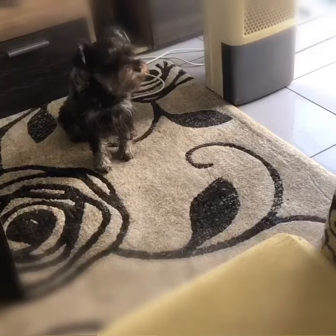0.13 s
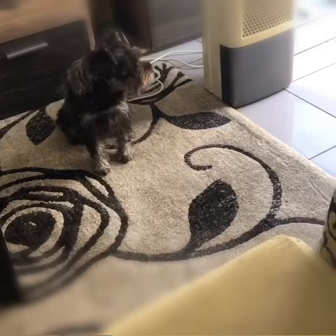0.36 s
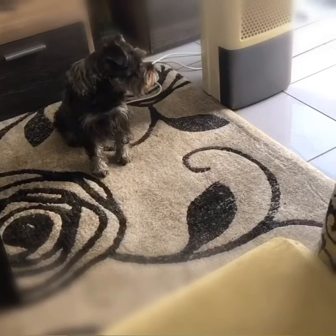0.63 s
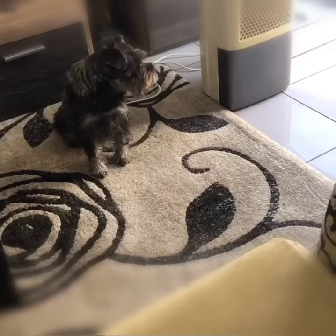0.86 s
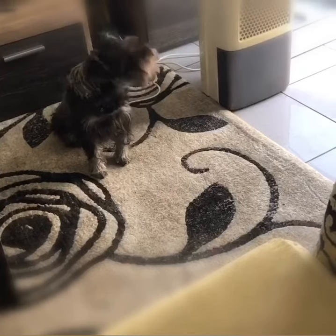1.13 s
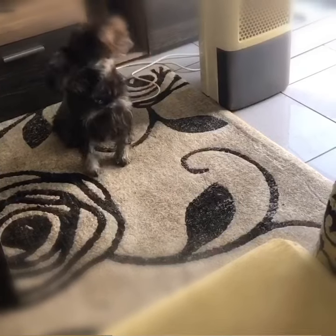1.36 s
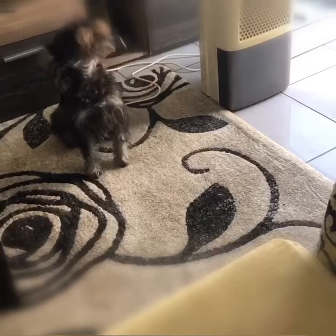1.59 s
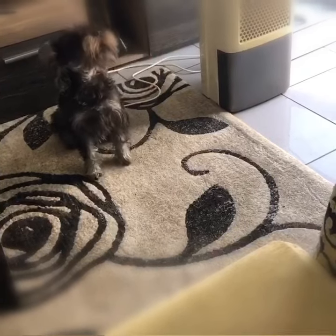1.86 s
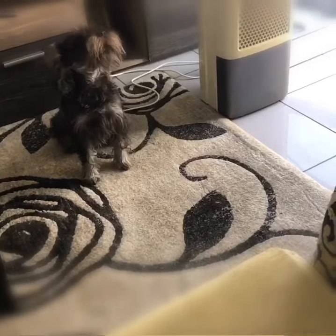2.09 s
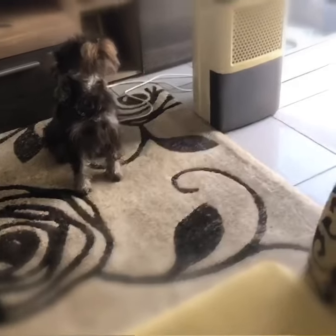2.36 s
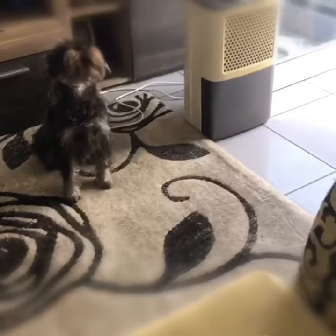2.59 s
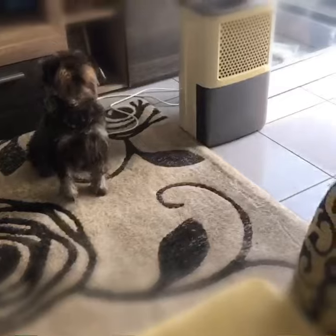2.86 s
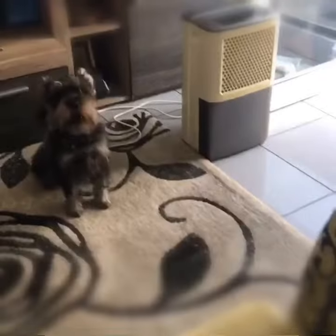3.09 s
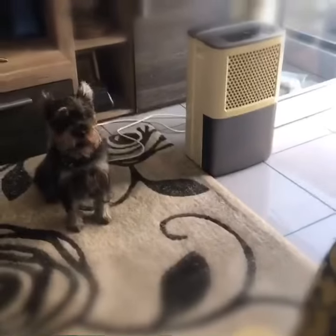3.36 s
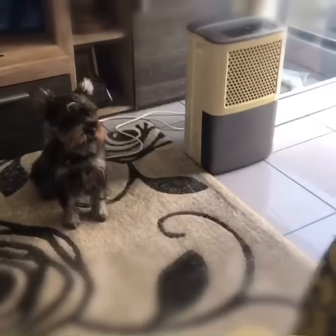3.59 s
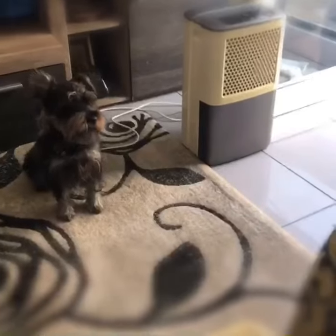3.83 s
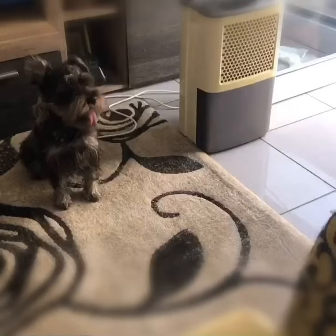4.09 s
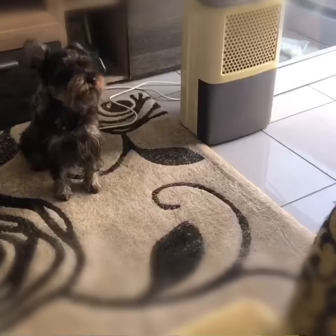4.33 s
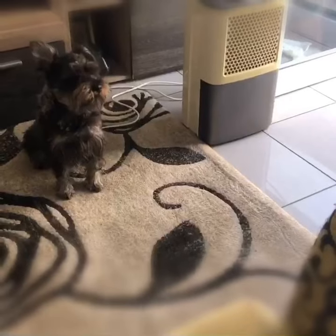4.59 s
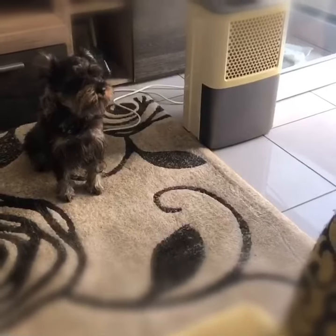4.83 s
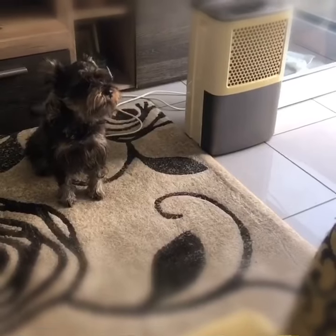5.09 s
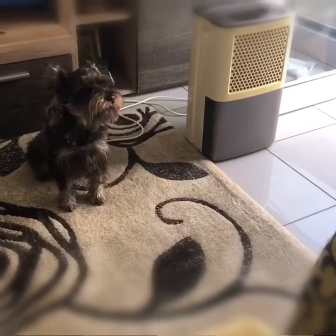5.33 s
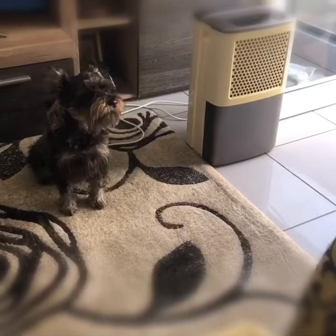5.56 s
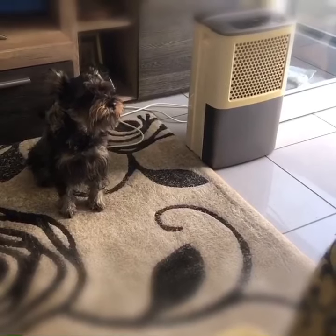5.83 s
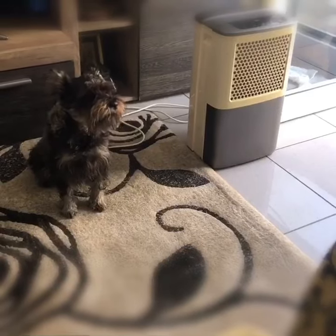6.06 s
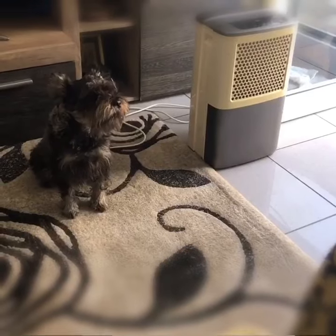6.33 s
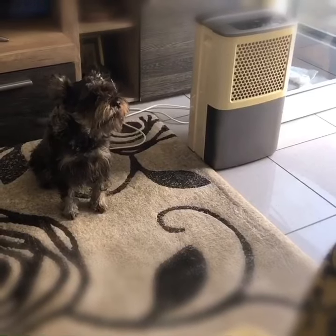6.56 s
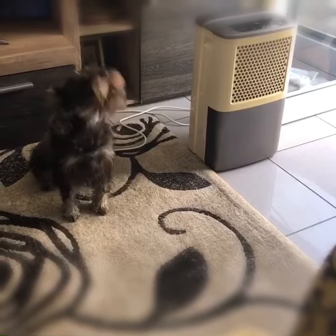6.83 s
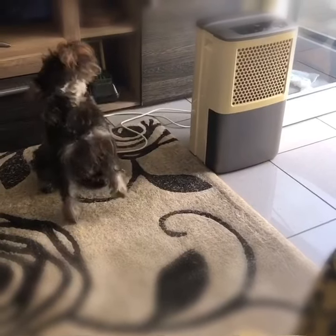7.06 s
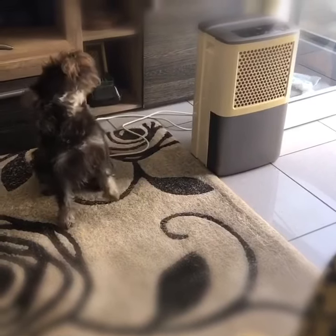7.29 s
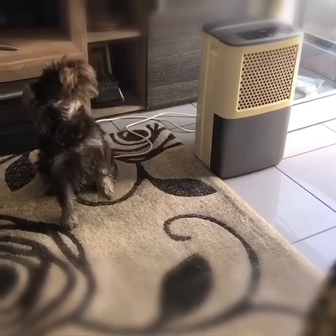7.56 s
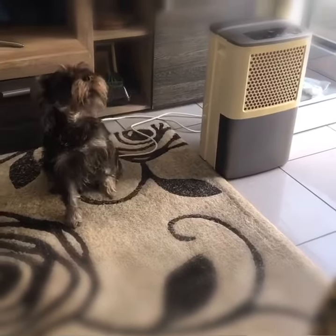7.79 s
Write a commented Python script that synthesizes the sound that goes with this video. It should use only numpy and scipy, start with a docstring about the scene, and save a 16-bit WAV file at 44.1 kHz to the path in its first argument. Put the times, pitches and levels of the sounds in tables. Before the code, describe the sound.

Two small dogs howl in turn in a hard-floored living room, hoarse yelping starts sliding into long, nearly pure falling tones with quiet pauses.

```python
"""Two small dogs howling in turn

In a living room with a hard floor a lower dog leads and a higher one joins in. Each voice is a stack of
partials on a gliding pitch, coloured by the jaw: a hoarse yelp, then a nearly pure tone that beats with
its echoes from feedback delays. Shaped noise makes soft rustles, room rumble, hum and a faint hiss.
The loudest peaks overload the microphone."""
import sys
import numpy as np
from scipy import signal
from scipy.fft import rfft, irfft, next_fast_len
from scipy.io import wavfile
from scipy.ndimage import uniform_filter1d

SR = 44100
rng = np.random.default_rng(int(sys.argv[2]) if len(sys.argv) > 2 else 0)


def persist_wave(psi):
    """Save psi, clipped to +-1, as 16-bit WAV."""
    counts = np.round(np.clip(psi, -1, 1) * 32767).astype(np.int16)
    wavfile.write(sys.argv[1], SR, np.atleast_2d(counts).T)


def gain_from_db(level_db):
    """Convert decibel levels to linear amplitude factors (20 dB per decade)."""
    decades = np.asarray(level_db, float) / 20
    return 10 ** decades


N = 349713


def in_time(rows):
    """Linear interpolation: each column of a table as a curve over all samples."""
    s, *columns = np.transpose(rows)
    return [np.interp(np.arange(N) / SR, s, c) for c in columns]


def at_hz(points, hz):
    """Interpolation on a logarithmic frequency axis, for spectra given by a few points."""
    return np.interp(np.log(hz), np.log(np.array(points)[:, 0]), np.array(points)[:, 1])


def coloured_noise(spectrum):
    """Spectral shaping: white noise weighted by a spectrum, brought to rms 1."""
    size = next_fast_len(N)
    hz = np.maximum(np.arange(size // 2 + 1) * SR / size, 1)
    white = rfft(rng.standard_normal(size))
    x = irfft(white * gain_from_db(at_hz(spectrum, hz)), size)[:N]
    return x / x.std()


def drift(rate, size):
    """Low-pass random process: noise at every 16th sample through a double one-pole filter; spread 1."""
    r = np.exp(-32 * np.pi * rate / SR)
    noise = rng.standard_normal(size // 16 + 602)
    slow = signal.lfilter([1], [1, -2 * r, r * r], noise)[600:]   # the filter's run-in is dropped
    return np.interp(np.arange(size) / 16, np.arange(len(slow)), slow / slow.std())


def room_tone():
    """Stationary noise with slow level modulation: a lumpy rumble and hiss, and a narrow hum that swells."""
    # rumble and hiss level: start_s, level_db
    tone_level = [(0.0, -54.5), (0.8, -60), (1.6, -60.5), (3.5, -53), (4.2, -52), (4.6, -56), (5.3, -57.5),
                  (5.8, -55), (6.56, -54), (7.02, -61), (7.51, -51), (7.93, -55)]
    # rumble and hiss spectrum: frequency_hz, density_db
    tone_colour = [(35, -37.5), (60, -8), (123, -0.5), (327, -5.5), (433, -10.5), (521, -5), (738, -11),
                   (1450, -14), (2310, -21), (2530, -17), (4030, -27.5), (8280, -33.5), (15500, -38.5)]
    # hum spectrum: frequency_hz, density_db
    hum_colour = [(220, -34), (300, -2.5), (325, 9.5), (350, -5.5), (480, -43.5)]
    # bell-shaped swells of the hum: centre_s, rise_db, width_s
    hum_swells = [(4.1, 15, 0.34), (5.8, 15.5, 0.38), (7.5, 10, 0.8)]
    resting_hum_db = -72
    t = np.arange(N) / SR
    rumble_db, = in_time(tone_level)
    swell_db = sum(db * np.exp(-((t - s) / width) ** 2) for s, db, width in hum_swells)
    rumble = gain_from_db(rumble_db + 3.0 * drift(8.2, N)) * coloured_noise(tone_colour)
    hum = gain_from_db(resting_hum_db + swell_db + 2.3 * drift(3.7, N)) * coloured_noise(hum_colour)
    return rumble + hum


def howl(rows, shut, wide, air, leak, effort_db, jitter, split, shimmer_db):
    """Source and filter: vocal-fold partials take the colour of throat and jaw; hoarseness unsettles the pitch."""
    s, *columns = np.transpose(rows)
    start, stop = round(s[0] * SR), min(round(s[-1] * SR), N)
    t = np.arange(start, stop) / SR
    pitch, voice_db, jaw, air_db = [np.interp(t, s, c) for c in columns]
    jaw = np.clip(jaw, 0, 1)
    effort_db = effort_db[start:stop]

    # much air for the effort: the folds close badly
    hoarse = np.clip(gain_from_db(air_db - effort_db + 13.5), 0, 1)
    unsteady = 0.0015 + jitter * hoarse
    pitch = uniform_filter1d(pitch, size=300, mode="nearest")
    phase = 2 * np.pi * np.cumsum(pitch * (1 + unsteady * drift(150, len(t)))) / SR
    tone = gain_from_db(voice_db) * np.sin(phase)

    # unsteady folds tear the overtones into bands of noise, and so does a wide jaw; the higher, the more
    torn = np.clip(14.3 * unsteady, 0, 1)
    tear_per_overtone = .08
    for k in range(2, 27):
        colour_db = (1 - jaw) * at_hz(shut, k * pitch) + jaw * at_hz(wide, k * pitch)
        level_db = effort_db + colour_db + shimmer_db * np.clip(drift(11, len(t)), -3.0, 1.0)
        share = torn * min(0.43 * (k - 1), 1) + tear_per_overtone * jaw * (k - 2)
        share = np.clip(share, 0, 1)
        tearing = 1 - share + share * drift(130, len(t))
        audible = k * pitch < 16000
        tone += audible * tearing * gain_from_db(level_db) * np.sin(k * phase)

    # hoarse folds repeat only every fourth cycle
    tone *= 1 + split * hoarse * np.cos(phase / 4 + 1.5 * drift(30, len(t)))
    # one puff each time the folds part
    puffs = (1 + np.cos(phase)) * gain_from_db(effort_db + 12.0 * jaw) * leak[start:stop]
    # hoarse air is chopped by uneven closing of the folds
    rasp = 0.14 * np.cos(phase / 3) * air[start:stop]

    # 4 ms fades; a howl that lasts to the end of the scene keeps its full level there
    to_end = s[-1] + (stop == N) - t
    edge = np.clip(np.minimum(t - s[0], to_end) / 0.004, 0, 1)
    out = np.zeros(N)
    out[start:stop] = edge * (np.sqrt(2) * tone + puffs + rasp)   # sqrt(2): partial levels are rms
    return out


def dog(howls, shut, wide, air_colour, leak_db, effort, jitter, split, shimmer_db):
    """Turbulence beside voicing: noise of rushing air, fluttering in level, joins the howls of one dog."""
    # spectrum of air that leaks past the folds: frequency_hz, density_db
    leak_colour = [(1500, -29), (3000, -10.5), (6000, -4.5), (10000, -3.5), (15500, -16)]
    air_tail_s, silent_db = .04, -95   # hoarse air dies this long after the voice
    air_rows = []
    for rows in howls:
        air_rows.append((rows[0][0] - .01, silent_db))
        air_rows += [(row[0], row[-1]) for row in rows]
        air_rows.append((rows[-1][0] + air_tail_s, silent_db))
    air_db, = in_time(air_rows)
    air = gain_from_db(air_db + 1.4 * drift(41, N)) * coloured_noise(air_colour)
    leak = gain_from_db(leak_db) * coloured_noise(leak_colour)
    effort_db, = in_time(effort)
    voice = sum(howl(rows, shut, wide, air, leak, effort_db, jitter, split, shimmer_db) for rows in howls)
    return air + voice


def lower_dog():
    """Vocal resonance at a lower pitch, with steadier folds."""
    # howls: start_s, pitch_hz, voice_db, jaw_opening (0-1), hoarse_air_db
    howls = [
        [(.37, 589, -49.5, 1, -62.5), (.392, 650, -39.5, .8, -24.5), (.462, 792, -13.5, .9, -21.5),
         (.55, 811.2, -4.5, 0.5, -46), (.61, 744.6, -8.5, 0.5, -34.5), (.7, 674.4, -11.5, 0.4, -49.5),
         (.808, 624.5, -14.5, 0, -58.5), (.95, 611.1, -14.5, 0, -62.5), (1.06, 604.8, -2, 0.11, -64.5),
         (1.18, 601.4, -23, 0.18, -54.5), (1.24, 596.3, -16.5, 0.04, -63), (1.56, 573.3, -20, 0, -60),
         (1.78, 564.8, -32.5, 0.6, -56.5), (1.93, 560, -40, 0.2, -67.5)],
        [(4.25, 588, -47.5, 0.6, -56), (4.262, 602, -34, 0.1, -22.5), (4.3, 691, -24.5, .8, -18),
         (4.34, 751.7, -23.5, .9, -25), (4.388, 822.4, -15.5, 0.9, -42.5), (4.466, 771, -6.5, .4, -58),
         (4.6, 671, -7.5, .05, -64), (4.7, 648, -9.5, 0.27, -63), (4.76, 638, -16.5, 0.37, -57.5),
         (4.83, 621.5, -7, 0.17, -54.5), (4.92, 611.4, -9, 0, -66), (5.1, 604.7, -7, 0.3, -61.5),
         (5.16, 598.8, -20, 0, -73.5), (5.29, 610.1, -9, 0, -60.5), (5.31, 585, -17, 0.65, -52.5),
         (5.33, 524, -28.5, 0.5, -54), (5.37, 438, -41.5, 0, -94)],
        [(7.87, 777, -51, 0.1, -53), (7.885, 738, -25, .1, -62), (7.93, 751, -30, 0.3, -61)],
    ]
    # throat and mouth colour over the partials, jaw nearly shut and wide open: frequency_hz, gain_db
    shut = [(1200, -12), (1500, -21.5), (1850, -43), (2450, -28), (3050, -51), (3600, -70), (4300, -45.5),
            (5000, -40.5), (6500, -48), (8500, -58), (10500, -56.5), (15000, -69.5)]
    wide = [(1500, -6.5), (2400, -26.5), (3100, -22), (3500, -36), (4100, -14.5), (5000, -25), (6500, -22),
            (7500, -34.5), (10500, -47.5), (15000, -50)]
    # hoarse air spectrum: frequency_hz, density_db
    air_colour = [(300, -45), (650, -13), (900, 0), (1150, -11), (1450, 5), (1900, -30), (2500, -19),
                  (3400, -25), (4200, -13), (6500, -37), (7500, -32), (10500, -44), (15000, -50.5)]
    # effort, heard as the level of the overtones: start_s, level_db
    effort = [(.37, -38), (.45, -5.5), (.6, -7.5), (.85, -8.5), (1.05, -15), (1.25, -23), (1.6, -22.5),
              (1.93, -45.5), (4.25, -35.5), (4.32, -5.5), (4.45, -2), (4.7, -8.5), (5.0, -12),
              (5.29, -14.5), (5.33, -42), (7.87, -43.5), (7.93, -36)]
    return dog(howls, shut, wide, air_colour, leak_db=-55.5, effort=effort,
               jitter=0.02, split=0.16, shimmer_db=7.0)


def higher_dog():
    """Vocal resonance at a higher pitch, with folds more easily unsettled."""
    # howls: start_s, pitch_hz, voice_db, jaw_opening (0-1), hoarse_air_db
    howls = [
        [(.84, 720, -17.5, 0.71, -49), (.865, 1002, -13.5, 0.61, -29.5), (.906, 1819, -25, 1, -27),
         (.93, 1945, -10.5, 1, -30.5), (.958, 1671, -17.5, .9, -34), (1.006, 910.7, -22, .8, -38),
         (1.04, 954.4, -28.5, .7, -45.5), (1.11, 1341, -15.5, 0.9, -59), (1.156, 1523, -16.5, 0.69, -43.5),
         (1.246, 1172, -15, 0.11, -56), (1.34, 1123, -19.5, .02, -55.5), (1.436, 1057, -15, 0.0089, -55),
         (1.542, 1022, -32.5, 0.011, -61.5), (1.694, 967, -13.5, 0.0045, -63.5),
         (1.776, 948.3, -20, 0.0077, -70), (1.924, 892.7, -24, 0.015, -67), (2.012, 838.2, -11.5, 0.011, -75.5),
         (2.115, 812.5, -26, 0.0057, -65), (2.17, 797, -23.5, .01, -66), (2.236, 786, -30, 0.014, -79),
         (2.262, 772, -15.5, 0.0092, -72.5), (2.444, 704.3, -24, 0.013, -71.5), (2.51, 679, -19, .01, -62.5),
         (2.55, 668, -16, 0.015, -52), (2.63, 663.8, -13.5, 0.012, -61), (2.75, 656.5, -23, 0.017, -67.5),
         (2.81, 655, -20, 0.012, -60), (2.85, 665.6, -28, 0.019, -59), (2.946, 576, -39, 0.019, -60.5),
         (3.0, 541, -46.5, .05, -52.5)],
        [(6.62, 678.3, -35.5, 0.9, -54.5), (6.645, 764.4, -5, 0.95, -24.5), (6.664, 957.5, -14.5, 0.78, -22.5),
         (6.672, 1151, -7, 0.65, -18.5), (6.695, 1171, -9.5, 0.73, -20), (6.703, 1366, -10.5, .95, -13),
         (6.76, 1407, -13, .5, -25), (6.81, 1257, -11.5, .5, -43), (6.85, 1365, -15.5, 0.59, -42.5),
         (6.92, 1298, -14, 0.21, -55), (6.955, 1271, -19.5, 0.17, -61), (7.008, 1206, -21, 0.041, -57.5),
         (7.1, 1167, -13, .01, -68.5), (7.16, 1181, -21.5, 0.0083, -61.5), (7.204, 1198, -30.5, 0.012, -62),
         (7.268, 1121, -19.5, 0.022, -65.5), (7.39, 1060, -12, 0.045, -50.5), (7.454, 1000, -16.5, 0.012, -49),
         (7.52, 965.6, -9, .01, -50), (7.59, 957.3, -6, .01, -57.5), (7.62, 967.4, -16.5, .01, -49),
         (7.724, 800, -23.5, 0.005, -49.5), (7.768, 723, -21, .01, -53), (7.855, 725, -33.5, 0.014, -51.5),
         (7.868, 1466, -52, 0.39, -52), (7.89, 1457, -32, 0.57, -54.5), (7.93, 1501, -27, 0.55, -57)],
    ]
    # throat and mouth colour over the partials, jaw nearly shut and wide open: frequency_hz, gain_db
    shut = [(500, -5), (1000, 16), (1400, -25.5), (2500, -51.5), (3000, -36.5), (3800, -62.5), (6000, -62),
            (7000, -68.5), (7600, -47.5), (9000, -48.5), (10800, -49.5), (11600, -68), (15000, -68.5)]
    wide = [(1500, -8), (2050, 7), (2800, -25.5), (3500, -11), (4300, -34.5), (6500, -33.5), (9000, -32),
            (11500, -49.5), (15000, -58.5)]
    # hoarse air spectrum: frequency_hz, density_db
    air_colour = [(180, -75), (300, -44), (658, -42), (814, -20), (1060, -18.5), (1110, 0), (1290, -6.5),
                  (1400, -6.5), (1650, -33), (1970, -8.5), (2870, -46), (3490, -20), (4390, -38),
                  (4850, -30), (15000, -36.5)]
    # effort, heard as the level of the overtones: start_s, level_db
    effort = [(.84, -34.5), (.87, -21.5), (.92, -17), (.96, -19), (1.04, -24), (1.13, -15.5), (1.25, -14),
              (1.6, -13.5), (2.0, -21.5), (2.45, -19), (2.85, -26), (3.0, -45), (6.62, -54.5), (6.664, -3),
              (6.75, -14), (6.88, -9), (7.1, -12), (7.4, -13.5), (7.62, -10.5), (7.72, -21.5),
              (7.86, -31.5), (7.89, -18), (7.93, -14.5)]
    return dog(howls, shut, wide, air_colour, leak_db=-55.0, effort=effort,
               jitter=0.031, split=0.3, shimmer_db=7.0)


def living_room(x):
    """Reverberation: feedback delays between walls, the treble dying sooner, then two all-pass diffusers."""
    # round trips between walls: delay_s
    echo_paths = [.0171, .0213, .0257, .0291, .0337, .0389, .0433, .0497, .0571, .0643, .0719, .0803]
    # reverberation time: frequency_hz, t60_s
    decay_times = [(300, .55), (700, .5), (1300, .38), (2500, .4), (6000, .28), (15000, .15)]
    size = next_fast_len(N + SR)
    w = 2 * np.pi * np.arange(size // 2 + 1) / size   # radians per sample
    t60 = at_hz(decay_times, np.maximum(w * SR / (2 * np.pi), 1))
    response = 0
    for k, lag in enumerate(echo_paths):
        loop = gain_from_db(-60 * lag / t60) * np.exp(-1j * w * lag * SR)
        response = response + (-1) ** k * loop / (1 - loop)
    for lag in (.0017, .0049):   # diffuser delays in seconds
        delay = np.exp(-1j * w * lag * SR)
        response = response * (delay - .6) / (1 - .6 * delay)
    return irfft(rfft(x, size) * response, size)[:N]


def rustles():
    """Friction noise: small movements in the pauses, broadband noise that fades in and out."""
    # movements: start_s, length_s, attack_s, body_db, sizzle_db (thin sizzle at the very top)
    movements = [(3.068, .4, 0.07, -53.5, -56.5), (3.539, 0.46, .12, -54.5, -68),
                 (4.012, 0.11, 0.026, -51.5, -69), (6.112, 0.27, 0.012, -60.5, -86),
                 (6.374, .06, 0.019, -51.5, -57)]
    # body spectrum: frequency_hz, density_db
    body_colour = [(350, -43.5), (600, -60), (815, -11.5), (1100, -6), (1470, -2), (1900, -7.5), (2490, -1),
                   (2950, -9.5), (3500, -8.5), (4300, -13), (6470, -23.5), (9000, -20.5), (13000, -44),
                   (22000, -120)]
    # sizzle spectrum: frequency_hz, density_db
    sizzle_colour = [(9000, -38), (12000, -5.5), (14000, 9), (16000, 1.5)]
    release_s = 0.13
    t = np.arange(N) / SR
    body, sizzle = 0, 0
    for start, length, attack, body_db, sizzle_db in movements:
        rise = (t - start) / attack
        fall = (start + length - t) / release_s + .5   # the fade-out is centred on the end
        shape = np.clip(np.minimum(rise, fall), 0, 1) ** 2
        body = body + gain_from_db(body_db) * shape
        sizzle = sizzle + gain_from_db(sizzle_db) * shape
    flutter = gain_from_db(2.5 * drift(16, N))
    return body * flutter * coloured_noise(body_colour) + sizzle * coloured_noise(sizzle_colour)


def scene():
    """Superposition: both dogs, their reverberation, rustles and room tone."""
    low = lower_dog()
    high = higher_dog()
    wet = living_room(gain_from_db(-16.5) * low + gain_from_db(-15) * high)
    return (low + high + wet + rustles() + room_tone())[None]


def roll_off(x):
    """The treble ends steeply here."""
    return signal.sosfilt(signal.butter(12, 15960, fs=SR, output="sos"), x)


def record(dry):
    """Asymmetric saturation: a sharp knee, sooner on the negative side, which leaves low thumps."""
    ceiling = np.where(dry > 0, .93, .89)
    overloaded = dry / (1 + np.abs(dry / ceiling) ** 12) ** (1 / 12)
    return roll_off(overloaded)


dry = scene()
out = record(dry)
persist_wave(out)
```